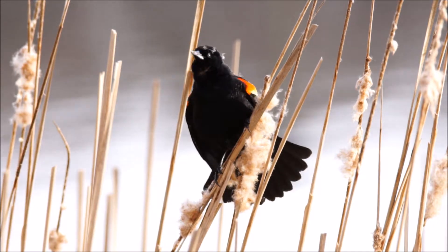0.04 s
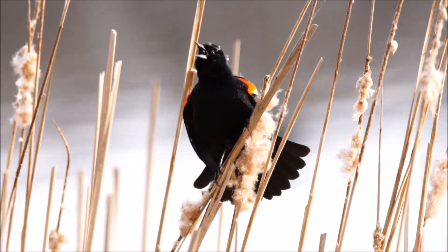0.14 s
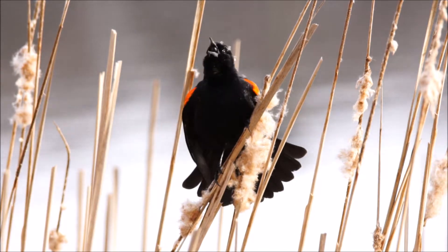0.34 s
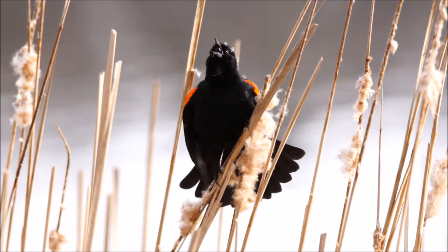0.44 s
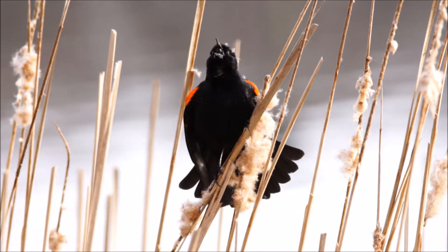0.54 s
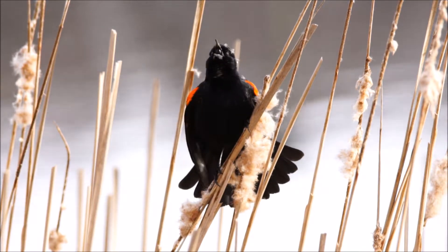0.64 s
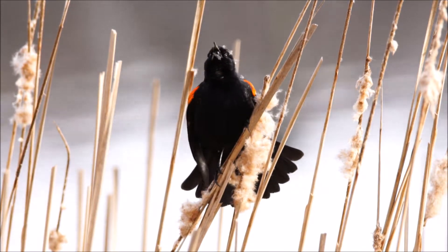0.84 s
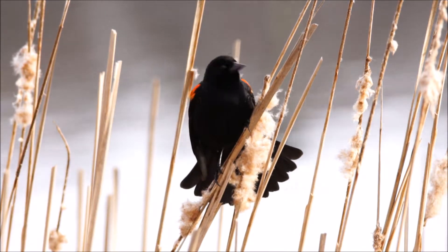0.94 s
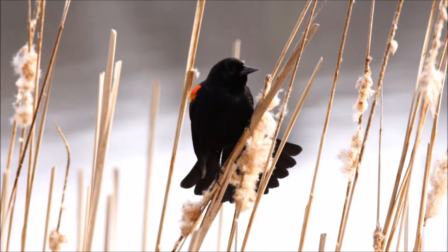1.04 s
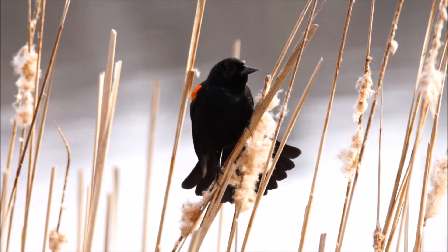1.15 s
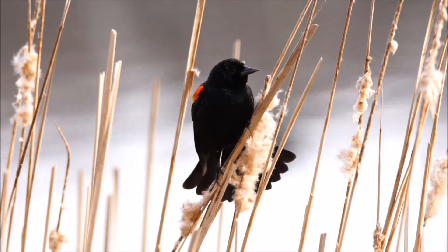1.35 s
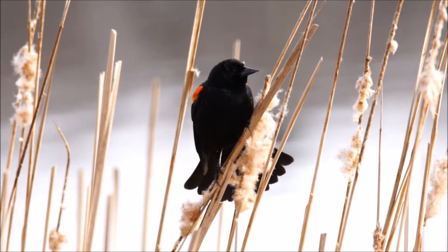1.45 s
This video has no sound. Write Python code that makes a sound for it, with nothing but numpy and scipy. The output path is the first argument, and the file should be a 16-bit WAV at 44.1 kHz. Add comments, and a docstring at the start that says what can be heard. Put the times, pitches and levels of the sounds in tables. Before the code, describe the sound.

A blackbird sings short gurgling notes and a buzzy trill, with faint birds beyond.

```python
"""Soft outdoor noise, a distant traffic hum and far bird calls open on a cattail marsh. Close by,
a red-winged blackbird gurgles with both sides of its syrinx, two independent oscillators, then trills:
short whistles joined by fast up-and-down flicks of pitch, filtered by its throat and beak.
Ground and reeds reflect the song. A second blackbird answers from far off, dulled and reverberant."""
import sys
import numpy as np
from scipy import signal
from scipy.fft import rfft, irfft
from scipy.io import wavfile

SR = 44100
rng = np.random.default_rng(int(sys.argv[2]) if len(sys.argv) > 2 else 0)


def unload_audio(sound):
    """Save the sound as a 16-bit wav file, at the path given as the first command line argument."""
    columns = np.transpose(np.atleast_2d(sound))
    # keep every value between -1 and 1, then stretch to whole-number steps
    steps = np.round(np.clip(columns, -1, 1) * 32767)
    wavfile.write(sys.argv[1], SR, steps.astype(np.int16))


N = 66150
T = np.arange(N) / SR


def undb(db):
    """Decibels to amplitude ratio."""
    return 10 ** (np.asarray(db) / 20)

def curve(rows, t, col=1):
    """Linear interpolation of one table column."""
    rows = np.array(rows, float)
    return np.interp(t, rows[:, 0], rows[:, col])

def fade(t, length, attack, release):
    """Envelope with raised-cosine edges."""
    rise = np.sin(np.pi / 2 * np.clip(t / attack, 0, 1)) ** 2
    return rise * np.sin(np.pi / 2 * np.clip((length - t) / release, 0, 1)) ** 2

def gate(rows):
    """Envelope spanning a table's times."""
    return fade(T - rows[0][0], rows[-1][0] - rows[0][0], .003, .0023)

def pan(db):
    """Interaural level difference, positive to the left."""
    return undb(np.array([[db], [-db]]) / 2)

def colour(x, points):
    """Spectral shaping by (frequency_hz, gain_db) points."""
    hz, db = np.array(points, float).T
    gain_db = np.interp(np.log(np.fft.rfftfreq(N, 1 / SR) + 1), np.log(hz), db)
    return irfft(rfft(x) * undb(gain_db), N)

def noise(points):
    """Filtered Gaussian noise of unit RMS."""
    x = colour(rng.standard_normal(N), points)
    return x / x.std()

def walk(rate_hz):
    """Low-pass random modulation of unit spread."""
    x = irfft(rfft(rng.standard_normal(N)) / (1 + (np.fft.rfftfreq(N, 1 / SR) / rate_hz) ** 2), N)
    return x / x.std()

def tone(hz, partials=((1, 0),)):
    """A vibrating membrane: phase is the integral of frequency."""
    phase = 2 * np.pi * (np.cumsum(hz) / SR + rng.random())
    return np.sqrt(2) * sum(undb(db) * np.sin(k * phase) for k, db in partials)

def scatter(x, t60_s, width):
    """Reverberation: dense reflections decay exponentially, unlike at the two ears."""
    mid, side = rng.standard_normal((2, N)) * undb(-60 * T / t60_s) * (T > .001)
    tail = (mid + width * side * np.array([[1], [-1]])) / np.sqrt(np.sum(mid ** 2))
    return signal.fftconvolve(x[None], tail, axes=1)[:, :N]


# outdoor noise spectrum: frequency_hz, gain_db
AIR_SPECTRUM = [(25, -21), (45, -12), (68, 1), (100, 0), (140, 1), (180, -3), (350, -7), (700, -6),
                (1200, -7), (1900, -11), (4000, -16), (7000, -24), (11000, -27), (15500, -29)]
# its stereo width: frequency_hz, side_minus_mid_db
AIR_WIDTH = [(30, -6), (150, -8), (600, -10), (2000, -12), (7000, -6), (13000, -1)]
RUMBLE_PAN_DB = -6.5

def outdoor_air(level_db=-48, rumble_edge_hz=280):
    """Broadband noise, partly coherent between the ears, with its rumble to the right."""
    air = noise(AIR_SPECTRUM) + colour(noise(AIR_SPECTRUM), AIR_WIDTH) * np.array([[1], [-1]])
    rumble = signal.sosfilt(signal.butter(1, rumble_edge_hz, fs=SR, output="sos"), air)
    return (air + rumble * (pan(RUMBLE_PAN_DB) - 1)) * undb(level_db + .5 * walk(4))

# hum envelope: time_s, level_db
HUM_LEVEL = [(0, -61.5), (.6, -61.5), (.9, -57), (1.1, -52.5), (1.35, -53), (1.5, -57.5)]

def traffic_hum(pitch_hz=146):
    """Distant traffic: a low tone, randomly modulated in frequency and amplitude."""
    hum = tone(pitch_hz * (1 + .015 * walk(6)))
    return hum * undb(curve(HUM_LEVEL, T) + 1.5 * walk(12)) * pan(RUMBLE_PAN_DB)

# chorus envelope: time_s, level_db
CHORUS_LEVEL = [(0, -53), (.15, -56), (.6, -38.5), (.95, -44.5), (1.15, -42), (1.5, -40)]
# chorus spectrum: frequency_hz, gain_db
CHORUS_SPECTRUM = [(1450, -36), (1630, -11), (1750, -35), (2300, -20), (2720, 0), (3080, -8.5), (3300, -1),
                   (3600, -14), (3800, -4), (4050, -13), (4300, -9), (4620, -22), (4900, -3), (5200, -20),
                   (7000, -58)]

def chorus():
    """Incoherent summation: many far blackbirds merge into bands of noise."""
    return noise(CHORUS_SPECTRUM) * undb(curve(CHORUS_LEVEL, T) + 1.2 * walk(30))

# calls of other birds: start_s, length_s, start_hz, end_hz, level_db
FAR_CALLS = [(-.02, 0.097, 1500, 1465, -41), (-.02, .09, 1220, 1205, -46.5),
             (0.119, 0.031, 1090, 1040, -44.5), (.18, .045, 1210, 1220, -53.5),
             (.49, .035, 1900, 1850, -48), (.562, .047, 1022, 1092, -43.5), (.625, .075, 1550, 1595, -43),
             (.76, .08, 1620, 1620, -36.5), (.82, .115, 1425, 1385, -44.5), (.98, .025, 1100, 1120, -49),
             (1.025, .03, 6550, 6480, -55), (1.058, 0.026, 1590, 1656, -45.5),
             (1.133, .05, 1475, 1490, -48), (1.28, .07, 1170, 1120, -53), (1.445, .08, 1570, 1595, -41)]

def far_calls():
    """Nearly pure tones glide slightly and leave a reverberant tail."""
    calls = np.zeros(N)
    for start, length, start_hz, end_hz, db in FAR_CALLS:
        hz = np.interp(T, [start, start + length], [start_hz, end_hz]) * (1 + .005 * walk(80))
        calls += tone(hz) * undb(db) * fade(T - start, length, .012, .018)
    return calls + undb(-13) * scatter(calls, t60_s=.5, width=.2)

# upper side of the syrinx: time_s, pitch_hz, harmonic1_db, harmonic2_db, harmonic3_db
UPPER_VOICE = [(.135, 1480, -54, -65, -78), (.15, 1590, -43.5, -50.5, -63), (.168, 1540, -54, -62, -64),
               (.176, 1560, -35.5, -65, -59), (.2, 1600, -54, -54, -34.5), (.21, 1650, -58, -33.5, -45.5),
               (.218, 1670, -49.5, -42, -46), (.225, 1689, -55, -24.5, -40), (.234, 1685, -54, -26, -38),
               (.245, 1655, -49, -38.5, -34), (.26, 1645, -48, -43.5, -27), (.281, 1652, -54, -50, -29),
               (.288, 1670, -53, -30.5, -47), (.3, 1600, -50, -44, -46), (.307, 1590, -32, -58.5, -50.5),
               (.32, 1610, -40, -65, -63), (.327, 1720, -61, -56, -59.5), (.335, 1740, -66.5, -30.5, -49.5),
               (.345, 1680, -64, -45.5, -40)]

def upper_syrinx():
    """Source and filter: the throat favours first one harmonic, then another."""
    hz = curve(UPPER_VOICE, T) * (1 + .004 * walk(300))
    gain1, gain2, gain3 = (undb(curve(UPPER_VOICE, T, col)) for col in (2, 3, 4))
    first = tone(hz) * gain1
    second = tone(2 * hz * (1 + .012 * walk(400))) * gain2 * undb(2.5 * walk(200))
    third = tone(3 * hz) * gain3
    return (first + second + third) * gate(UPPER_VOICE)

# rasp envelope: time_s, level_db
RASP_LEVEL = [(.14, -74), (.19, -63), (.21, -51), (.218, -33.5), (.245, -35.5), (.262, -30), (.29, -37.5),
              (.305, -50), (.33, -52), (.345, -45.5), (.36, -31), (.378, -25.5), (.39, -47)]
# rasp spectrum: frequency_hz, gain_db
RASP_SPECTRUM = [(1800, -35), (2750, -2.5), (3100, 3.5), (3450, 0), (3800, -2.5), (4100, -3.5),
                 (4600, -17.5), (5000, -2), (5600, -20.5), (6500, -28), (8500, -36), (15000, -43.5)]

def rasp():
    """Amplitude-modulated noise roughens the opening notes."""
    return noise(RASP_SPECTRUM) * undb(curve(RASP_LEVEL, T) + 2 * walk(200)) * gate(RASP_LEVEL)

# lower side of the syrinx: time_s, pitch_hz, level_db
LOWER_VOICE = [(.148, 1878, -60), (.16, 2171, -49), (.169, 2480, -38.5), (.174, 2066, -37),
               (.181, 1968, -34.5), (.195, 1990, -47.5), (.208, 2496, -53), (.217, 2817, -28.5),
               (.225, 2788, -58), (.242, 2788, -25.5), (.258, 2830, -31), (.28, 2750, -40), (.3, 2530, -27),
               (.303, 2041, -33.5), (.312, 2054, -27), (.323, 2080, -28), (.326, 2660, -42),
               (.338, 2880, -36), (.348, 2880, -43.5)]
# its harmonics: multiple, gain_db
LOWER_HARMONICS = [(1, -0.5), (2, -36.5), (3, -31.5)]

def lower_syrinx():
    """Biphonation: a second oscillator sounds at once, rough with jitter and shimmer."""
    voice = tone(curve(LOWER_VOICE, T) * (1 + .0089 * walk(400)), LOWER_HARMONICS)
    return voice * undb(curve(LOWER_VOICE, T, col=2) + 2.4 * walk(220)) * gate(LOWER_VOICE)

# hisses: start_s, length_s, level_db
HISS_BURSTS = [(.15, 0.031, -56), (.178, 0.054, -44.5), (.228, 0.068, -57), (.295, 0.019, -46.5),
               (.316, 0.022, -43)]
# hiss spectrum: frequency_hz, gain_db
HISS_SPECTRUM = [(4000, -30), (5500, 2), (6450, 1), (7600, -8), (9000, -16), (10200, -10.5), (11400, -9),
                 (12500, -21), (15500, -23)]

def beak_hiss(edge_s=.0077):
    """High-frequency noise radiates as the beak opens."""
    bursts = sum(undb(db) * fade(T - start, length, edge_s, edge_s) for start, length, db in HISS_BURSTS)
    return noise(HISS_SPECTRUM) * bursts

# tone bursts: start_s, length_s, pitch_hz, level_db
REGISTER_ACCENTS = [(0.218, 0.005, 3420, -25), (0.306, .008, 2067, -34)]

def accents(edge_s=.0017):
    """Sharp transients mark changes of register in the opening notes."""
    return sum(tone(hz * (1 + .018 * walk(500))) * undb(db) * fade(T - start, length, edge_s, edge_s)
               for start, length, hz, db in REGISTER_ACCENTS)

# one flick: before_whistle_s, pitch_hz, gain_db
FLICK_SWEEP = [(.0095, 3343, -23.5), (.0072, 4300, -4.5), (.0056, 5300, -2.5), (0.0042, 6050, -21),
               (.003, 5500, -3), (.0019, 4500, 0), (.0006, 3500, 0), (-.002, 3150, -14)]
# its breathy edge: frequency_hz, gain_db
BREATH_SPECTRUM = [(2000, -12), (3400, 9), (5000, 1.5), (6000, 1.5), (7000, -7.5), (9000, -5.5),
                   (10000, -15), (15000, -25.5)]
# throat and beak resonances: frequency_hz, gain_db
TRACT_RESPONSE = [(2600, -6), (2950, -8.5), (3150, -10.5), (3330, -1), (3560, 4), (3720, -8), (3860, -26),
                  (4020, -3.5), (4270, 0), (4430, -6), (4540, -15), (4720, 0), (4930, 5.5), (5110, -12.5),
                  (5260, -2), (5600, -1), (6000, -6.5), (6600, -11.5)]

def flicks(rows, pitch_ratio=1, jitter_s=.0004, copy_delay_s=.0017, copy_db=-6):
    """Fast frequency sweeps excite the tract; each (time_s, level_db) row gives one and a weaker copy."""
    sweeps, envelope = np.zeros((2, N))
    shape = FLICK_SWEEP[::-1]
    tail_s, head_s = shape[0][0], shape[-1][0]
    for (time, db), chance in zip(rows, rng.standard_normal((len(rows), 2, 4))):
        for (lag, drop), (late, sharp, loud, quick) in zip([(0, 0), (copy_delay_s, copy_db)], chance):
            before = (time + lag + jitter_s * late - T) * np.exp(.15 * quick)
            on = (before > tail_s) & (before < head_s)
            level = undb(db + drop + 1.2 * loud + curve(shape, before[on], col=2))
            level *= fade(head_s - before[on], head_s - tail_s, .001, .001)
            sweeps[on] += tone(curve(shape, before[on]) * pitch_ratio * (1 + .015 * sharp)) * level
            envelope[on] += level
    breath = undb(-8) * envelope * noise(BREATH_SPECTRUM)
    return colour(sweeps + breath, TRACT_RESPONSE)

# pitch arch of a whistle: fraction_of_length, offset_hz
WHISTLE_ARCH = [(0, -10.5), (.38, 41), (.88, -45), (1, -37.5)]
WHISTLE_LEAD_S = .003

def whistles(rows, centre_hz, partials, wobble):
    """Frequency modulation arches a short tone for each (start_s, length_s, level_db) row."""
    bend, level = np.zeros((2, N))
    for start, length, db in rows:
        age = T - start + WHISTLE_LEAD_S
        on = (age > 0) & (age < length)
        bend[on] = curve(WHISTLE_ARCH, age[on] / length)
        level[on] += undb(db) * fade(age[on], length, attack=.0061, release=.0056)
    return level * tone((centre_hz + bend) * (1 + wobble * walk(250)), partials)

# bare flicks that start the trill: time_s, level_db
TRILL_LEAD = [(.3520, -17), (.3695, -18)]
# syllables: start_s, level_db
TRILL_SYLLABLES = [(.3855, -17), (.4098, -15.5), (.4362, -15.5), (.4615, -15.5), (.4875, -14), (.5130, -15),
                   (.5410, -15), (.5715, -15.3), (.6009, -14), (.6282, -14.5), (.6545, -15.5), (.6824, -14),
                   (.7100, -15.5), (.7365, -15.3), (.7635, -16), (.7892, -14.5), (.8178, -15),
                   (.8444, -14.5), (.8702, -14.5), (.8991, -16)]
# whistle centre: time_s, pitch_hz
TRILL_CENTRE = [(.38, 2900), (.55, 2893), (.78, 2878), (.92, 2835)]
# whistle partials: multiple, gain_db
TRILL_PARTIALS = [(1, 0), (2, -30.5), (2.5, -47), (3, -46.5), (4, -57.5), (4.5, -54.5)]
# airy noise on each whistle: frequency_hz, gain_db
AIRY_SPECTRUM = [(1800, -5), (2400, 4), (5800, 3.5), (6500, -4.5), (7800, -9), (8550, 9), (9300, -16.5),
                 (11000, -17), (15000, -19)]
# the other side of the syrinx, an octave below: multiple, gain_db
SUBHARMONIC_PARTIALS = [(.5, -19.5), (1.5, -1)]
# its strength against the whistle: time_s, gain_db
SUBHARMONIC_GAIN = [(.38, -25.5), (.75, -24), (.88, -17.5), (.93, -28)]
# the closing beak softens flicks and airy noise: time_s, gain_db
BEAK_GAIN = [(.35, -2), (.72, -2), (.86, -3), (.92, -9.5)]

def trill(end_s=.925, gap_s=.005, airy_db=-35, flick_db=-7):
    """Whistles with a subharmonic alternate with flicks about 37 times a second."""
    ends = [start - gap_s for start, _ in TRILL_SYLLABLES[1:]] + [end_s]
    rows = [(start, end - start + WHISTLE_LEAD_S, db) for (start, db), end in zip(TRILL_SYLLABLES, ends)]
    centre_hz, beak = curve(TRILL_CENTRE, T), undb(curve(BEAK_GAIN, T))
    whistle = whistles(rows, centre_hz, TRILL_PARTIALS, wobble=.00732)
    envelope = np.abs(signal.hilbert(whistle)) / np.sqrt(2)
    airy = undb(airy_db) * envelope * noise(AIRY_SPECTRUM)
    subharmonic = whistles(rows, centre_hz, SUBHARMONIC_PARTIALS, wobble=.0083)
    joins = flicks(TRILL_LEAD, pitch_ratio=.92)
    joins += flicks([(start, db + flick_db) for start, db in TRILL_SYLLABLES])
    return whistle + subharmonic * undb(curve(SUBHARMONIC_GAIN, T)) + (airy + joins) * beak

def closing_note(start_s=.922, length_s=.018, pitch_hz=2740., level_db=-29):
    """A soft, lower pure tone ends the trill."""
    return tone(np.full(N, pitch_hz)) * undb(level_db) * fade(T - start_s, length_s, .004, .005)

# far blackbird's held tones: start_s, length_s, pitch_hz, level_db
ANSWER_NOTES = [(.94, .06, 4990, -41.5), (.94, .19, 2740, -42.5), (.97, .15, 3300, -48),
                (1.075, .06, 5020, -41.5)]
# flicks that start its trill: time_s, level_db
ANSWER_LEAD = [(1.118, -37), (1.133, -38), (1.147, -35.5), (1.163, -35.5)]
# its trill envelope: time_s, level_db
ANSWER_LEVEL = [(1.11, -38), (1.185, -32.5), (1.22, -33.5), (1.25, -31), (1.3, -35.5), (1.5, -41)]
# treble lost on the way: frequency_hz, gain_db
PATH_RESPONSE = [(2800, 0.5), (4000, -2), (5000, 1), (5500, -10.5), (7000, -19)]

def far_blackbird(trill_start_s=1.1185, period_s=.0326, whistle_s=.014, pitch_hz=2715):
    """A lower, slower song, dulled by absorption over distance and blurred by reverberation."""
    times = trill_start_s + period_s * np.arange(12)
    levels = curve(ANSWER_LEVEL, times)
    rows = [(start, whistle_s, db) for start, db in zip(times, levels)]
    song = whistles(rows, pitch_hz, [(1, 0)], wobble=.012)
    song += flicks(ANSWER_LEAD + list(zip(times + .004, levels - 1)), pitch_ratio=.85)
    for start, length, hz, db in ANSWER_NOTES:
        song += tone(hz * (1 + .012 * walk(120))) * undb(db) * fade(T - start, length, .01, .015)
    song = colour(song, PATH_RESPONSE)
    return undb(-3) * song + undb(-2) * scatter(song, t60_s=.6, width=.15)

def scene(ground_delay_s=.0076):
    """Superposition of the near song, its reflections, the far birds and the background."""
    song = upper_syrinx() + lower_syrinx() + rasp() + beak_hiss() + accents() + trill() + closing_note()
    ground = undb(-14) * np.interp(T - ground_delay_s, T, song)
    reeds = undb(-16) * scatter(song, t60_s=.06, width=.56)
    marsh = undb(-26.5) * scatter(song, t60_s=.6, width=.3)
    near = (song + ground + reeds + marsh) * pan(-.2)
    far = (far_blackbird() + far_calls()) * pan(-.9)
    return near + far + outdoor_air() + traffic_hum() + chorus()

def record(dry, cutoff_hz=15700):
    """Band limiting: a steep low-pass filter cuts the highest treble."""
    return signal.sosfilt(signal.ellip(10, .1, 80, cutoff_hz, fs=SR, output="sos"), dry)


dry = scene()
out = record(dry)
unload_audio(out)
```